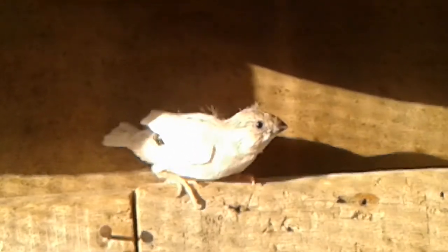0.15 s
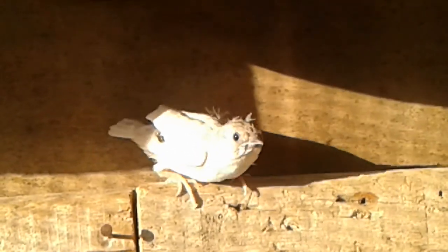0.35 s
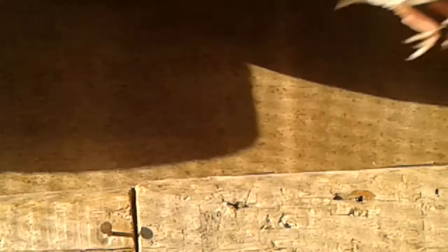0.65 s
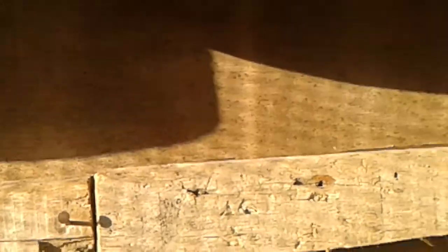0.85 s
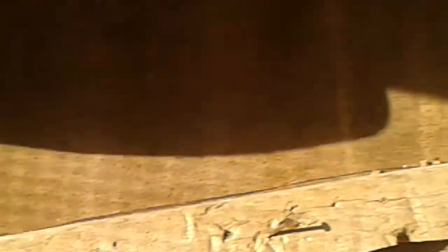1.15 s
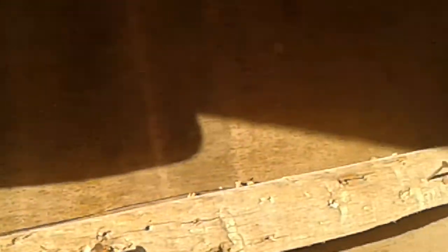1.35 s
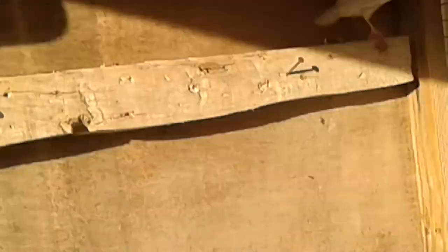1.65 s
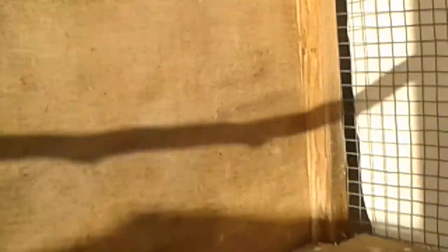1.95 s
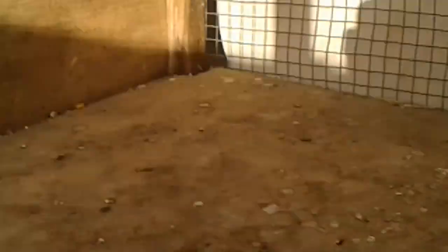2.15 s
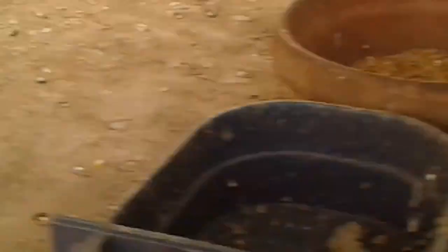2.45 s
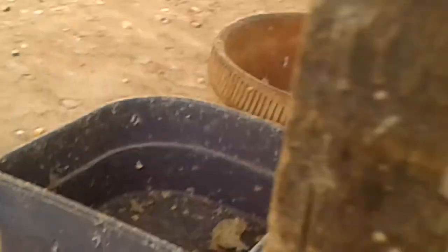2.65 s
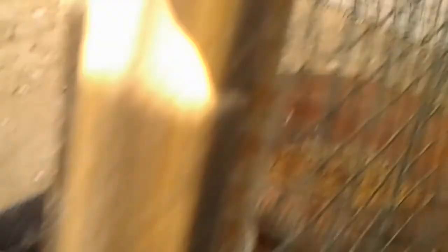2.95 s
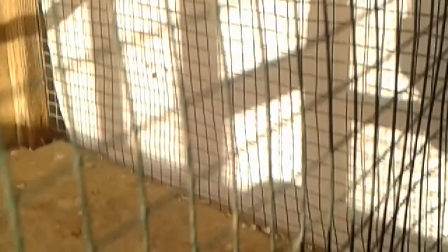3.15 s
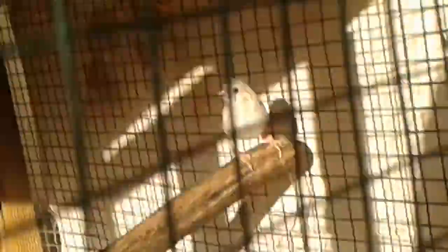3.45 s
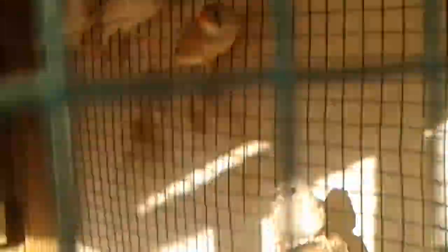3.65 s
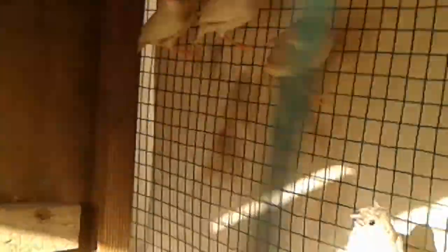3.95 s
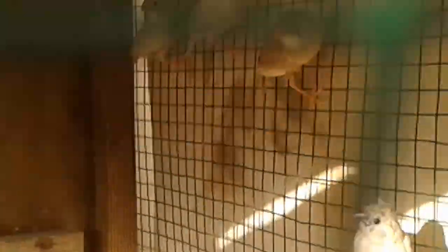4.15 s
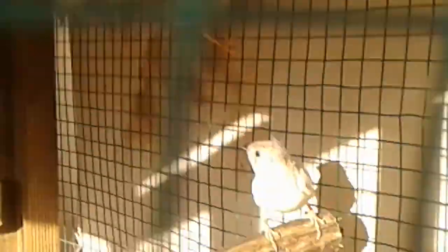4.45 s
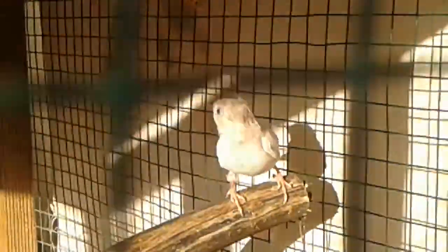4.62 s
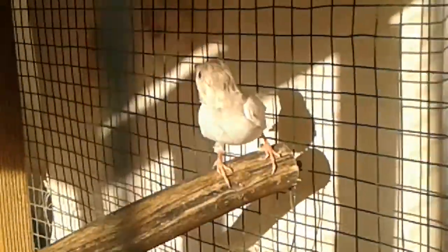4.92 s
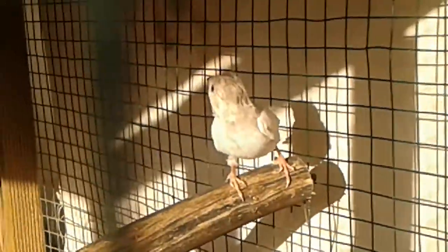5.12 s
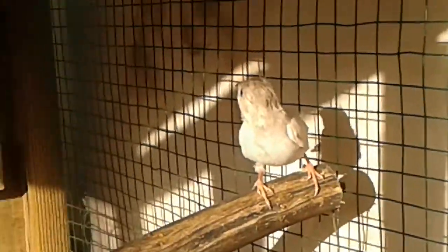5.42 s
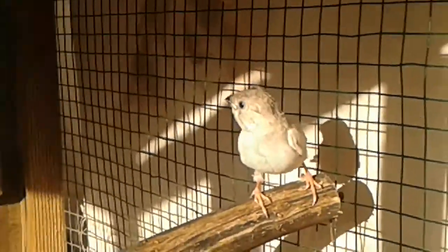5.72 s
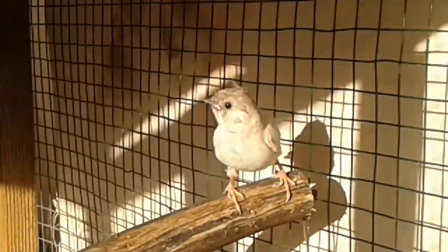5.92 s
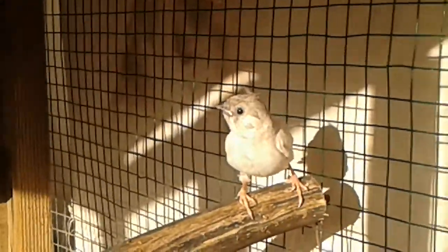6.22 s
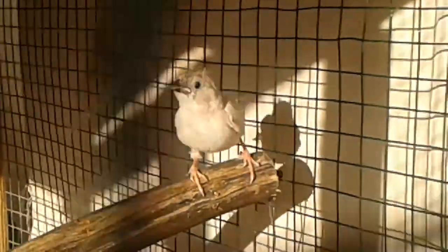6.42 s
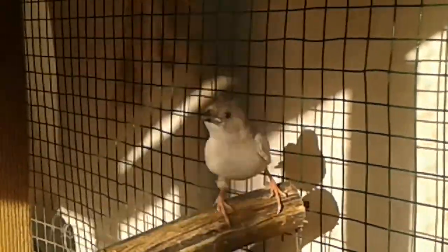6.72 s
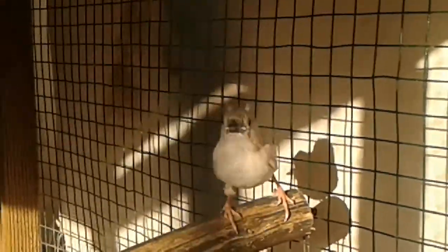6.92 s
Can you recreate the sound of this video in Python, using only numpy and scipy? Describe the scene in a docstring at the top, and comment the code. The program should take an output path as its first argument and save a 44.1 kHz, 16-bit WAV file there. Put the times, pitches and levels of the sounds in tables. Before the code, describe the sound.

A handheld microphone close to small finches picks up very short, buzzy toy-horn calls and softer gliding peeps behind them. Wings puff, claws tick on wood, and a landing clatters against boards and wire. Midway, gritty hissing contact and a dull bump pass close by. Then it is quieter, with separate calls, an upward-flicking chirp and another sharp tick, in a dry little wooden enclosure with a low outdoor murmur.

```python
"""Short nasal calls of zebra finches sound close by in a small plywood and wire aviary, thin peeps further
back. Calls are harmonic buzzes coloured by the throat; peeps and one flicking chirp are gliding whistles with
overtones. Blows of noise with resonant thuds are birds landing on wood and wire; claws and beaks tick, wings
puff air. Something rubs and bumps close to the microphone as hissing, grainy noise. Behind it lie a low outdoor
rumble and the faint scratching stir of the flock, both drifting shaped noise."""
import sys
import numpy as np
from scipy import signal
from scipy.fft import rfft, irfft
from scipy.io import wavfile
from scipy.ndimage import uniform_filter1d, map_coordinates

SR = 44100
rng = np.random.default_rng(int(sys.argv[2]) if len(sys.argv) > 2 else 0)


def transcribe(u):
    """Save the signal u as a 16-bit wav file named by the first command-line argument.

    u: samples, shape (n,) or (channels, n), limited to [-1, 1]; the rate is SR.
    q: integer samples, one column per channel.
    """
    v = np.clip(np.atleast_2d(u).T, -1, 1)
    q = np.round(v * 32767).astype(np.int16)
    wavfile.write(sys.argv[1], SR, q)


N = 311874
TIME = np.arange(N) / SR  # s

# scratchy spectrum of small taps, shared by the ticks and the rustling flock: f/Hz, level/dB
SCRATCH_COLOUR = [(1000, -8.5), (2600, 0.5), (4500, 6), (7000, -14), (15000, -28)]


def from_db(db):
    """Decibels to gain."""
    return 10 ** (np.asarray(db) / 20)


def rms_one(x):
    """Scale to an rms of one."""
    return x / np.sqrt(np.mean(x ** 2) + 1e-20)


def at_hz(points, hz):
    """Read a spectrum in dB on a log-frequency axis."""
    f, db = np.transpose(points)
    return np.interp(np.log(np.maximum(hz, 1)), np.log(f), db)


def add(out, s, sound):
    """Mix a sound in, starting at s seconds; whatever lies outside the scene is cut off."""
    at = round(s * SR)
    lo, hi = max(at, 0), min(at + len(sound), N)
    out[lo:hi] += sound[lo - at:hi - at]


def noise(colour, size=N):
    """Noise with the given spectrum, rms 1."""
    spectrum = rfft(rng.standard_normal(size))
    gains = from_db(at_hz(colour, np.fft.rfftfreq(size, 1 / SR)))
    return rms_one(irfft(spectrum * gains, size))


def drift(rate):
    """Smooth chance that changes about rate times a second, rms 1."""
    lowpass = signal.butter(2, min(rate, SR / 4), fs=SR, output="sos")
    return rms_one(signal.sosfilt(lowpass, rng.standard_normal(N)))


def decay(s, t60, rise_s=0.00055):
    """Envelope of a slightly cushioned blow at s seconds, falling 60 dB in t60 seconds."""
    age = np.maximum(TIME - s, 0)
    return np.minimum(age / rise_s, 1) * from_db(-60 * np.minimum(age / t60, 2))


def swell(u, top, fullness):
    """Air pressure builds to its top and falls away; greater fullness keeps the level up for longer."""
    arch = np.sin(np.pi * np.interp(u, [0, top, 1], [0, .5, 1]))
    return np.abs(arch) ** (1 / fullness)


def nasal_calls():
    """The syrinx buzzes in harmonics whose pitch turns once; the throat's colour sinks as the beak closes."""
    # the near birds' calls, pitches before rounding and end sag:
    # start/s, length/s, start f/Hz, turn f/Hz, end f/Hz, level/dB, voice
    calls = [(-.04, .056, 560, 600, 500, -33.5, "full"), (.888, .055, 740, 588, 545, -28, "full"),
             (1.158, .054, 670, 758, 775, -31, "hollow"), (1.286, .1, 640, 652, 672, -28, "ringing"),
             (1.511, .055, 480, 545, 482, -31, "bright"), (1.636, .054, 620, 635, 535, -41.5, "soft"),
             (2.48, .039, 600, 640, 585, -41.5, "soft"), (2.522, .076, 620, 635, 560, -43.5, "soft"),
             (2.846, .06, 510, 550, 455, -39.7, "bright"), (3.404, .048, 620, 640, 572, -43.5, "soft"),
             (3.744, .05, 490, 530, 515, -33.7, "ringing"), (4.416, .05, 610, 640, 595, -44, "soft"),
             (4.466, .077, 680, 755, 515, -31.5, "full"), (5.557, .094, 600, 622, 615, -40.5, "hollow"),
             (5.816, .056, 520, 545, 465, -38, "bright"), (6.261, .047, 590, 635, 535, -44.5, "soft"),
             (6.307, .1, 580, 618, 475, -34.5, "narrow"), (6.4, .065, 470, 510, 495, -37.5, "narrow"),
             (6.587, .074, 830, 860, 460, -31, "full"), (6.793, .053, 475, 532, 485, -33.3, "bright"),
             (6.971, .052, 465, 525, 525, -41, "ringing"), (7.056, .045, 480, 530, 480, -34, "bright")]
    # ways of calling, by voice: loudest point/fraction of the call, throat gains/dB at each of throat_hz
    voices = {"soft": (0.6, [-20.5, -9.5, -2, -4.5, -2, 1.5, -17, -25, -47]),
              "hollow": (0.38, [-27.5, -19.5, -6.5, -0.5, -5, 1, -2, -27, -45]),
              "narrow": (0.57, [-29.5, -21, -16, -9.5, -9.5, 2.5, -20, -32, -53]),
              "bright": (0.73, [-28.5, -16.5, -14, -8, 0.5, 3.5, -5.5, -12, -36.5]),
              "full": (0.54, [-26, -19.5, -14, -7.5, -1, 1, -4, -31, -49]),
              "ringing": (0.64, [-29.5, -27, -19, -18.5, -5, 2.5, -4.5, -24.5, -51])}
    # points of the throat's colour: f/Hz
    throat_hz = [600, 1800, 2450, 3050, 3650, 4300, 5000, 6000, 10000]
    turn_at, turn_rounding = .33, .22  # fractions of the call
    end_sag_octaves, beak_closing_octaves = .07, 0.12
    air_db = -16  # breath against the buzz, ahead of its puffing
    top_hz = 11000  # no harmonics from here up

    out = np.zeros(N)
    jitter = .008 * drift(240)
    k = np.arange(1, 27)[:, None]
    for start, length_s, start_hz, turn_hz, end_hz, level_db, kind in calls:
        top, throat_db = voices[kind]
        colour = list(zip(throat_hz, throat_db))
        u = np.linspace(0, 1, round(length_s * SR))
        octaves = np.interp(u, [0, turn_at, 1], np.log2([start_hz, turn_hz, end_hz]))
        rounded = uniform_filter1d(octaves, round(turn_rounding * len(u)), mode="nearest")
        hz = 2 ** (rounded - end_sag_octaves * u ** 10)
        unsteady = jitter[(round(start * SR) + np.arange(len(u))) % N]
        phase = 2 * np.pi * np.cumsum(hz * (1 + unsteady)) / SR

        # reading the colour ever higher moves its peaks down
        throat = from_db(at_hz(colour, k * hz * 2 ** (beak_closing_octaves * (u - .5))))
        gains = throat * (k * hz < top_hz)
        buzz = rms_one((gains * np.cos(k * phase + rng.standard_normal(k.shape))).sum(0))
        puffs = 1 + np.cos(phase)  # one in every cycle
        air = from_db(air_db) * noise(colour, len(u)) * puffs
        call = boards_nearby((buzz + air) * swell(u, top, fullness=1.51))
        add(out, start, from_db(level_db) * rms_one(call))
    return out


def chirp():
    """A closer, brighter whistle that dips and then flicks upward, following its own pitch and level."""
    # the path of the one chirp, level ahead of echoes: t/s, f/Hz, level/dB
    path = [(5.058, 2090, -49), (5.08, 1680, -42.5), (5.098, 1656, -40), (5.108, 2097, -36.5),
            (5.14, 2420, -42.5)]
    fade_s = .008
    out = np.zeros(N)
    s, hz, db = np.transpose(path)
    t = np.arange(s[0], s[-1], 1 / SR)
    jitter = .018 * drift(770)[:len(t)]
    voice = whistle(np.interp(t, s, hz), jitter, brightness_db=6.0)
    fade = np.minimum(np.minimum(t - s[0], s[-1] - t) / fade_s, 1)
    add(out, s[0], boards_nearby(from_db(np.interp(t, s, db)) * fade * voice))
    return out


def boards_nearby(x, count=4):
    """The boards around the perch send back early echoes, so gliding harmonics beat and break up."""
    nearest_s, farthest_s, echo_db = .0005, .006, -10
    out = np.pad(x, (0, round(farthest_s * SR)))
    for lag in (rng.uniform(nearest_s, farthest_s, count) * SR).astype(int):
        out[lag:lag + len(x)] += from_db(echo_db) * x
    return out


def peeps():
    """Short gliding whistles that swell and fade; the pitch bends and trembles on its way."""
    # thin peeps further back, level ahead of the enclosure's reflections:
    # start/s, length/s, mid-glide f/Hz, whole glide/octaves, level/dB
    notes = [(.381, .05, 2950, -.42, -44), (.771, .05, 3100, -.4, -48), (1.85, .03, 3200, -.49, -51),
             (2.262, .045, 1130, -.3, -47), (2.32, .03, 2850, -.35, -46), (3.323, .041, 1045, -.24, -50),
             (3.463, .035, 2570, -.2, -50), (3.542, .036, 1090, -.1, -47), (3.657, .06, 2620, -.48, -48.5),
             (3.835, .083, 2620, -.31, -52), (4.034, .045, 2620, .15, -52), (4.2, .075, 3100, -.05, -50),
             (5.339, .043, 1478, .02, -53), (5.765, .054, 2960, -.1, -54.5), (5.929, .06, 2950, -.3, -56),
             (6.104, .045, 2880, .04, -53), (6.13, .025, 3200, .1, -51), (6.479, .038, 2540, -.32, -46.5),
             (6.681, .045, 2660, -.2, -49)]
    out = np.zeros(N)
    wobble = .025 * drift(490) + .018 * drift(40)  # fast jitter and slower wander
    for start, length_s, mid_hz, glide_octaves, level_db in notes:
        u = np.linspace(0, 1, round(length_s * SR))
        hz = mid_hz * 2 ** (glide_octaves * (u - .5))
        voice = whistle(hz, wobble[round(start * SR) + np.arange(len(u))], brightness_db=-3.0)
        add(out, start, from_db(level_db) * rms_one(voice * swell(u, top=0.44, fullness=2.3)))
    return out


def whistle(hz, wobble, brightness_db):
    """A whistled note with a few overtones, tilted by brightness_db per octave above the fundamental."""
    # colour of the whistling throat: f/Hz, level/dB
    throat_colour = [(1000, -2.5), (2300, 8), (3200, -1.5), (4700, -1), (9000, -42)]
    k = np.arange(1, 7)[:, None]
    phase = 2 * np.pi * np.cumsum(hz * (1 + wobble)) / SR
    gains = from_db(at_hz(throat_colour, k * hz) + brightness_db * np.log2(k))
    return rms_one((gains * np.sin(k * phase)).sum(0))


def knocks(thud_lasts=1.83):
    """A blow rattles the boards and thuds for longer where the struck part resonates; struck mesh rings on."""
    # landings and bumps: t/s, rattle level/dB, rattle t60/s, thud f/Hz, thud against rattle/dB
    blows = [ (0.435, -29.5, 0.14, 980, -22), (0.508, -38, 0.093, 920, -31), (0.764, -38.5, 0.11, 775, -15),
             (1.381, -36, 0.17, 567, -5), (2.158, -27.5, 0.088, 112, -5), (4.759, -39, 0.18, 206, 0)]
    # ringing modes of the wire mesh: f/Hz, level against the mesh hit/dB, t60/s
    mesh_modes = [(2374, -11, .33), (2804, -2, .09), (4300, -6, .06), (5100, -9, .2)]
    # rattling boards: f/Hz, level/dB
    board_colour = [(40, -6), (150, -7), (1000, 2), (1700, -5), (4600, -1), (6500, -25), (15000, -86)]
    mesh_hit_s, mesh_hit_db = .437, -23.5

    out = np.zeros(N)
    boards = noise(board_colour)
    for s, level_db, t60, thud_hz, thud_db in blows:
        resonance = signal.iirpeak(thud_hz, 1.5, fs=SR)
        thud = rms_one(signal.lfilter(*resonance, rng.standard_normal(N)))
        rattling = boards * decay(s, t60)
        thudding = from_db(thud_db) * thud * decay(s, thud_lasts * t60)
        out += from_db(level_db) * (rattling + thudding)
    for hz, db, t60 in mesh_modes:
        out += from_db(mesh_hit_db + db) * decay(mesh_hit_s, t60) * np.sin(2 * np.pi * hz * TIME)
    return out


def ticks(ring_t60=0.083, crack_t60=0.0061, crack_db=3, ring_db=-5, faint_per_s=14, faint_top_db=-53):
    """Claws and beaks tap on wood, a crack and a brief ring: some sharp ticks and many faint ones."""
    # sharp ticks, strength ahead of crack and ring gains: t/s, level/dB
    sharp = [(.2015, -35), (.3263, -35), (.6635, -42), (.856, -39), (2.21, -28), (4.172, -42), (4.259, -42),
             (5.3165, -45), (6.4707, -31), (6.7336, -43)]
    # faint taps fall at random, with strengths anywhere below their top
    taps = (rng.random(N) < faint_per_s / SR) * from_db(faint_top_db) * rng.random(N)
    for s, tap_db in sharp:
        taps[round(s * SR)] = from_db(tap_db)
    dying = np.zeros(N)
    for db, t60 in ((crack_db, crack_t60), (ring_db, ring_t60)):
        kept_per_sample = from_db(-60 / (t60 * SR))
        dying += from_db(db) * signal.lfilter([1], [1, -kept_per_sample], taps + 1e-18)
    return noise(SCRATCH_COLOUR) * dying


def wings(beats_hz=27, depth_db=2.5, ramp_s=0.026):
    """Every wing beat pushes a puff of air through the feathers, which crackle unevenly."""
    # bursts of fluttering: start/s, end/s, level/dB
    flutters = [(0.07, 0.355, -46), (0.798, 0.933, -50), (1.32, 1.57, -49.5), (3.708, 3.92, -51),
                (4.51, 4.76, -54.5)]
    # air through feathers: f/Hz, level/dB
    feather_colour = [(170, 1.5), (600, -10), (4300, -5), (7000, -24.5), (15000, -36.5)]
    effort = np.zeros(N)
    for start, end, db in flutters:
        effort += from_db(db) * np.clip(np.minimum(TIME - start, end - TIME) / ramp_s, 0, 1)
    beat = np.sin(2 * np.pi * np.cumsum(beats_hz * (1 + drift(1.8) / 10)) / SR)
    crackle = drift(114)
    return effort * rms_one(noise(feather_colour) * from_db(depth_db * (beat + crackle)))


def brushing(grain_db=2.0):
    """Sliding contact hisses, brighter under more pressure, catching and slipping in fine grains."""
    # long and short rub, pressure as level: t/s, level/dB
    long_rub = [(1.9, -67), (1.964, -41.5), (2.064, -44), (2.11, -33.5), (2.158, -34), (2.178, -55),
                (2.195, -36.5), (2.302, -36.5), (2.33, -46), (2.44, -45), (2.462, -35.5), (2.488, -50.5),
                (2.598, -60), (2.638, -39), (2.7, -55)]
    short_rub = [(3.051, -64), (3.102, -41.5), (3.262, -43), (3.408, -54.5)]
    # the rubbing resonance dives at the bump and climbs back: t/s, shift/octaves
    resonance_shift = [(2.135, 0.13), (2.19, -.8), (2.275, .1), (2.36, 0.047)]
    # brief scuffs: middle t/s, half length/s, level/dB, fine hiss against rub/dB
    scuffs = [(0.229, 0.05, -49.5, -8.5), (1.794, 0.048, -38, -23)]
    # body of the rub, then its fine hiss: f/Hz, level/dB
    rub_colour = [(2200, -7), (4200, 15), (5600, 6), (6600, -18.5), (10000, -41)]
    fine_colour = [(4000, -11), (7000, 5.5), (9000, 12), (15500, -0.5)]
    usual_rub_db, usual_fine_db = -42, -12.5  # fine hiss against the rub at its usual level
    fine_db_per_db = 0.1  # growth of the fine hiss with pressure

    # reading the noise slower or faster shifts its resonance
    speed = 2 ** np.interp(TIME, *np.transpose(resonance_shift))
    rub = map_coordinates(noise(rub_colour), [np.cumsum(speed)], mode="wrap")
    fine = noise(fine_colour)
    strokes = np.zeros(N)
    for s, half, db, fine_db in scuffs:
        shape = np.exp(-np.minimum(((TIME - s) / half) ** 4, 20))
        strokes += from_db(db) * shape * (rub + from_db(fine_db) * fine)
    for curve in (long_rub, short_rub):
        s, db = np.transpose(curve)
        level_db = np.interp(TIME, s, db)
        fine_db = usual_fine_db + fine_db_per_db * (level_db - usual_rub_db)
        touching = (TIME > s[0]) * (TIME < s[-1])
        strokes += touching * from_db(level_db) * (rub + from_db(fine_db) * fine)
    return strokes * from_db(grain_db * drift(300))


def background():
    """Low outdoor rumble and the faint scratching stir of the flock, noises whose levels drift."""
    # course of the bed, ahead of its drifting: t/s, low murmur of air level/dB, high rustle level/dB
    bed = [(0, -54, -54.5), (1.85, -59.5, -61), (2.35, -51.5, -46.5), (3.0, -60.5, -55), (5.4, -64, -75),
           (5.9, -59, -56), (6.22, -61.5, -68.5), (7.07, -56.5, -60.5)]
    # murmuring air: f/Hz, level/dB
    air_colour = [(30, 1), (120, 8.5), (1500, -8.5), (3000, -24)]
    s, air_db, rustle_db = np.transpose(bed)
    air = from_db(np.interp(TIME, s, air_db) + drift(22.0)) * noise(air_colour)
    rustle = from_db(np.interp(TIME, s, rustle_db) + 1.1 * drift(45)) * noise(SCRATCH_COLOUR)
    return air + rustle


def aviary(x, wet_db, t60):
    """Dense reflections from nearby boards arrive after a few milliseconds and die quickly."""
    tail = (rng.standard_normal(N) * decay(0.0088, t60))[:SR // 2]
    return x + from_db(wet_db) * signal.fftconvolve(x, tail / np.linalg.norm(tail))[:N]


def scene():
    """Near and far birds share one enclosure; both channels carry the same sound."""
    near = aviary(nasal_calls() + chirp(), wet_db=-17.0, t60=0.34)
    far = aviary(peeps(), wet_db=-4.0, t60=0.089)
    contacts = aviary(knocks() + ticks() + wings(), wet_db=-10.0, t60=0.19)
    return np.tile(near + far + contacts + brushing() + background(), (2, 1))


def record(dry):
    """A very faint, steady noise, independent in each channel, is added; deepest bass and top are cut."""
    faint_noise = from_db(-82) * rng.standard_normal(dry.shape)
    bass_cut = signal.butter(2, 48, "high", fs=SR, output="sos")
    top_cut = signal.ellip(10, .1, 70, 15800, fs=SR, output="sos")
    return signal.sosfilt(top_cut, signal.sosfilt(bass_cut, dry + faint_noise))


dry = scene()
out = record(dry)
transcribe(out)
```